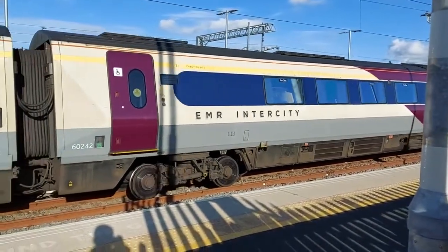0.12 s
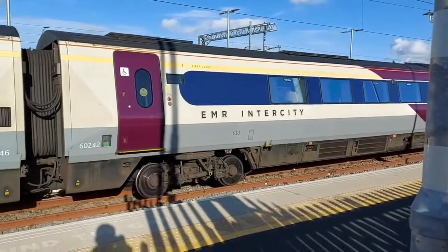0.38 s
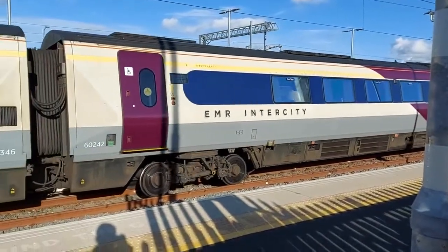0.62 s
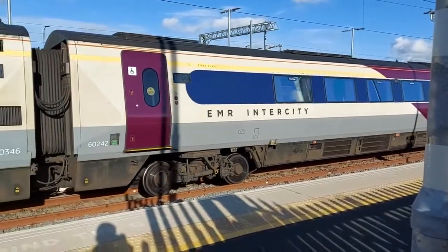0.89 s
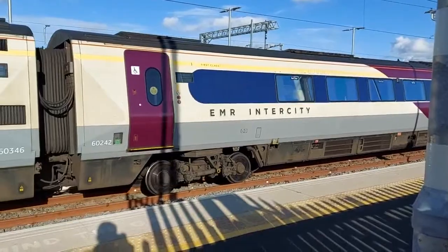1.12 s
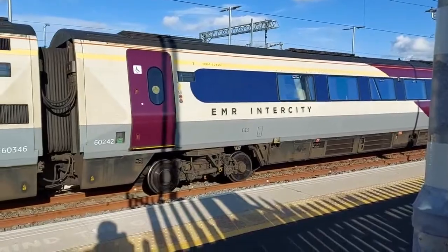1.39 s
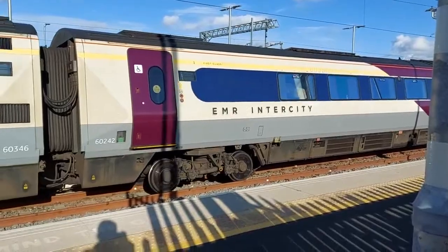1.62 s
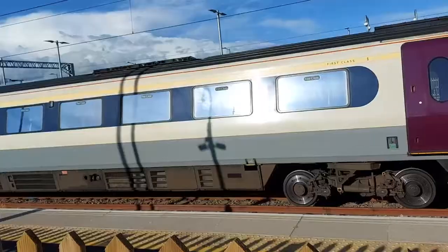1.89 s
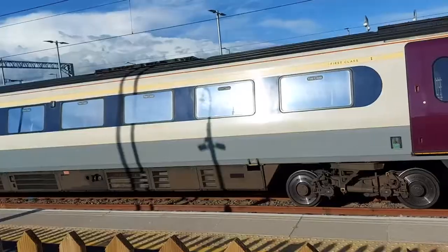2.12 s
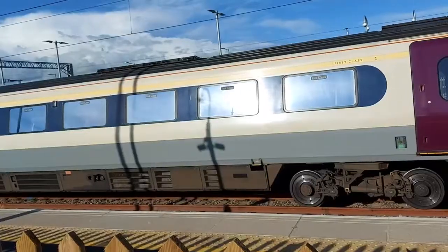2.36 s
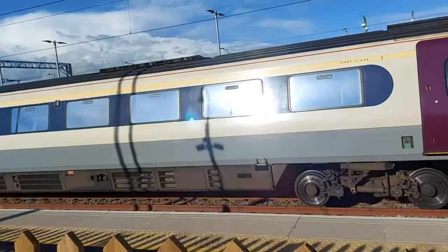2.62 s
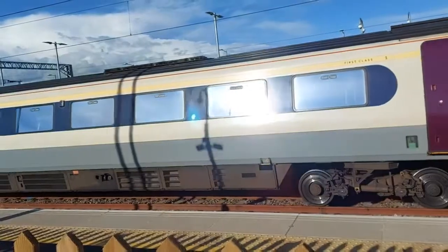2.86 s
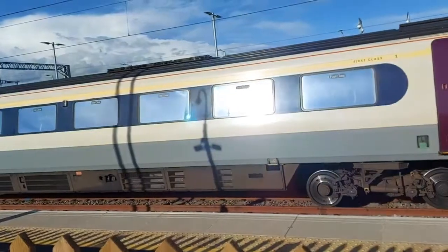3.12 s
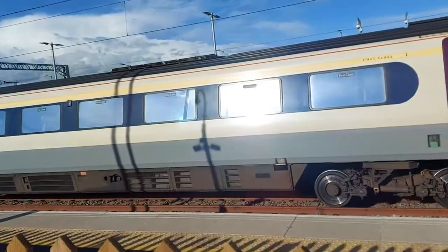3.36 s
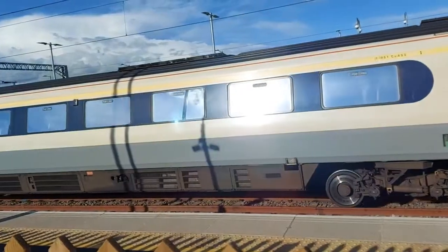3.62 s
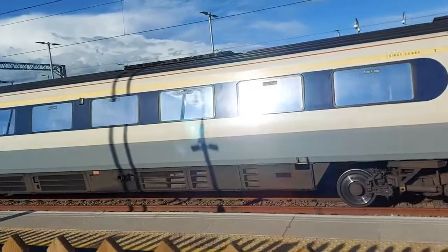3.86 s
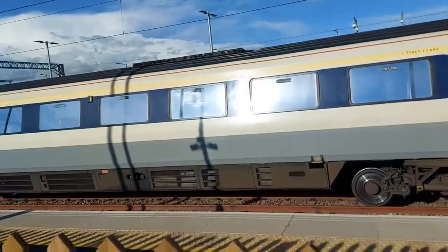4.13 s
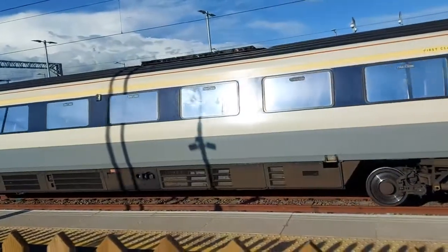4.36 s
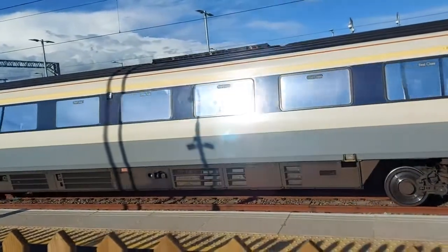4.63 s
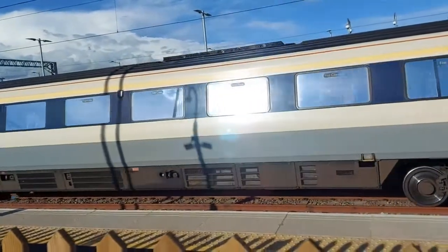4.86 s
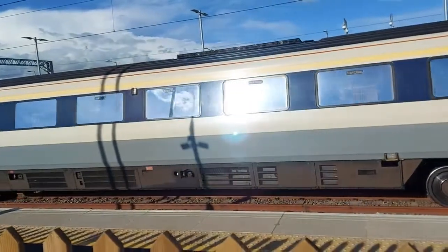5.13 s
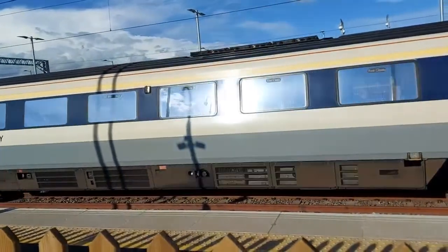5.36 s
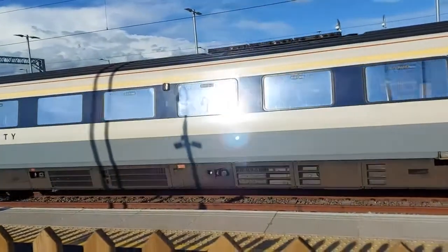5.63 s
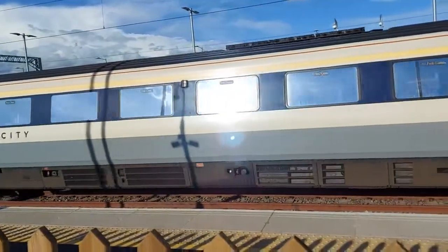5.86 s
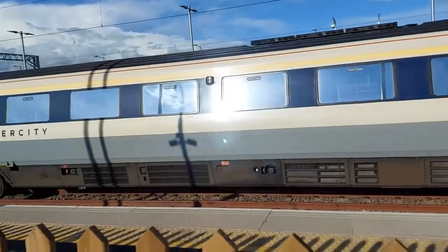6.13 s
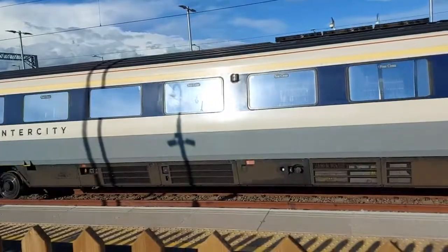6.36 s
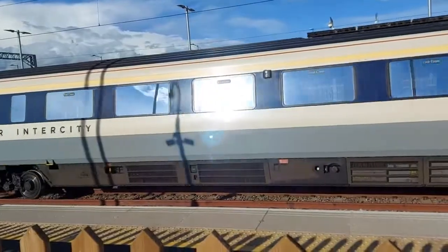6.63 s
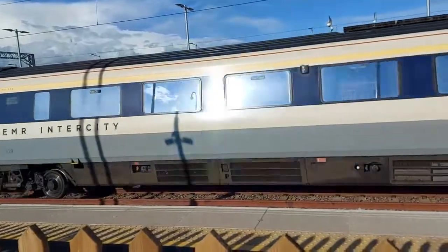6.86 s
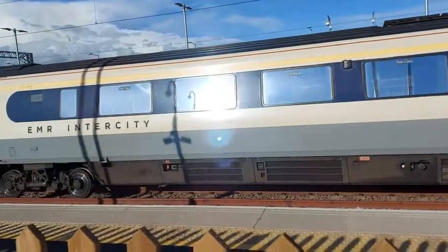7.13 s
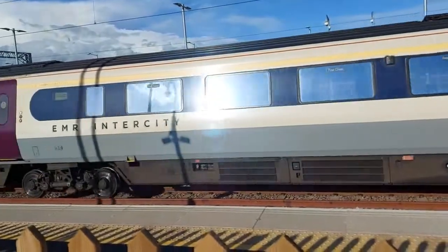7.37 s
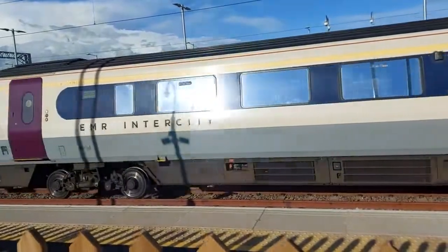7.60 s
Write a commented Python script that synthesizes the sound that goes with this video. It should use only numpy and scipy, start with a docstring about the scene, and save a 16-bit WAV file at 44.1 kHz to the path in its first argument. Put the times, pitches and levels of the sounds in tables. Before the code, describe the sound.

Fast-idling diesel train drones close by, then a sudden change of spot brings a deeper rising engine roar, airy hiss, and faint wheel rubbing.

```python
"""A diesel train at a station platform, heard through two ports from two spots joined by a cut at 2 s.
First we stand beside fast-idling underfloor engines: knocking noise repeats each cycle, exhaust tones throb,
thin gear tones waver, a hum fades early and a whistle passes. Further along the engines rev up and pull away:
exhaust harmonics climb and dip, blocks clatter, air hisses, converters whine and wind buffets the ports.
A late engine swells as narrow noise bands make a flange rub; last, an engine draws near under rings and ticks."""
import sys
import numpy as np
from scipy import signal
from scipy.fft import rfft, irfft, next_fast_len
from scipy.io import wavfile
from scipy.ndimage import uniform_filter1d, map_coordinates

SR = 44100
rng = np.random.default_rng(int(sys.argv[2]) if len(sys.argv) > 2 else 0)


def wav_out(sig):
    """Save sig, one row per channel (or a flat mono array), as 16-bit PCM at SR to the path in sys.argv[1]."""
    wavfile.write(sys.argv[1], SR, np.round(np.clip(np.atleast_2d(sig).T, -1, 1) * 32767).astype(np.int16))


def to_linear_factor(level_db):
    """Convert decibel levels (scalar or array-like) to linear amplitude factors."""
    exponent = np.asarray(level_db, float) / 20
    return 10 ** exponent


N = 341334
TIME = np.arange(N) / SR
SIZE = next_fast_len(N)
FREQ = np.maximum(np.arange(SIZE // 2 + 1) * SR / SIZE, 1)
CUT_S = 2.007  # the listening spot changes

# Arrival at the two ports. Each row: time in seconds, lag of the left port in samples (negative: right lags).
LEFT_LAG = [(0, 12.5), (2.0, 12.5), (2.02, 25.5), (4.2, 22), (4.7, -12), (5.7, -8.5), (7.74, 7)]
# How near an engine is while pulling away. Each row: time in seconds, nearness in dB.
NEARNESS = [(2.02, 2.5), (3.2, -1), (4.4, 3), (5.7, 2), (6.3, 12), (7.0, 15), (7.74, 18.5)]
# Likeness of the ports while pulling. Each row: frequency in Hz, shared part of the power (0-1).
PULL_ALIKE = [(60, 0.88), (300, 0.89), (500, 0.51), (800, 0.25), (1500, 0.29), (3100, 0.32), (6000, 0.11),
              (15000, 0.049)]
# Balance of the ports while pulling. Each row: frequency in Hz, left minus right in dB.
PULL_BALANCE = [(60, -1), (110, 2), (200, -0.5), (380, -0.5), (700, 2), (1290, 0), (2380, -1), (4400, -0.5),
                (8120, -2.5), (15000, -2.5)]
# Exhaust harmonics and the gear-mesh tone (multiple 14) swell for a moment, or sink where the lift is negative.
# Each row: time in seconds, half length in seconds, multiple of the firing rate, lift in dB.
SWELLS = [(0.24, 0.54, 3, 6), (1.48, 0.14, 3, 4), (2.02, 0.16, 3, 8), (3.57, 0.19, 3, 1),
          (7.24, 0.36, 3, 8.5), (4.92, 0.47, 4, 11), (5.74, 0.43, 4, 3.5), (6.2, 0.34, 14, 10),
          (7.42, .15, 14, 8), (6.85, 0.091, 1, 3), (2.2, 0.041, 2, -6), (2.49, 0.45, 14, 15),
          (0.89, 0.15, 1, 6), (.45, 0.066, 1, 5)]


def level(x, db):
    """Scale to an rms level."""
    return x * to_linear_factor(db) / np.sqrt(np.mean(x ** 2))


def curves(table):
    """Columns of a time table, one value a sample."""
    s, *columns = np.transpose(table)
    return [np.interp(TIME, s, c) for c in columns]


def over_hz(table):
    """A (Hz, value) table on every frequency bin, joined along log frequency."""
    hz, value = np.transpose(table)
    return np.interp(np.log(FREQ), np.log(hz), value)


def walk(rate):
    """Random values drawn rate times a second, smoothly joined; spread near 1."""
    points = rng.standard_normal(int(N / SR * rate) + 4)
    return map_coordinates(points, [TIME[::32] * rate]).repeat(32)[:N]


def bell(s, half_s):
    """A smooth hump of height 1."""
    return np.exp(-((TIME - s) / half_s) ** 2)


def fade_db(s, rise_s, hold_s, fall_s, depth_db=25):
    """Rise, hold and fall in dB, at -120 dB outside."""
    times = s + np.cumsum([0, rise_s, hold_s, fall_s])
    return np.interp(TIME, times, [-depth_db, 0, 0, -depth_db], left=-120, right=-120)


def humps(rows, count):
    """The summed dB of the rows that touch one harmonic, each at its own listening spot."""
    return sum(db * bell(s, half_s) * ((TIME > CUT_S) == (s > CUT_S))
               for s, half_s, k, db in rows if round(k) == count)


def tone(phase, db, waver_db=0.0, rate=8):
    """A sine whose level wavers."""
    waver = uniform_filter1d(waver_db * walk(rate), size=32)
    return np.sqrt(2) * to_linear_factor(db + waver) * np.sin(phase)


def resonance(white, hz, width):
    """Noise spectra passed through one narrow band, back in time."""
    return irfft(white / (1 + (2 * (FREQ - hz) / width) ** 4), SIZE)[:, :N]


def spread(shared, colour, alike, balance_db, lift=None, aim=1):
    """Colour a source for two ports: a shared part offset in arrival, and a diffuse part of each."""
    # Ringing panels. Each row: frequency in Hz, width in Hz, lift while waiting in dB, lift while pulling in dB.
    panels = [(805, 10, 1, 4.5), (990, 770, 2, -3.5), (1737, 62, 9, 4), (3026, 150, 9, 2.5),
              (5070, 420, 6.5, 4.5)]
    db = over_hz(colour) + np.array([[.5], [-.5]]) * over_hz(balance_db)
    for hz, width, *lift_db in panels if lift is not None else []:
        db = db + lift_db[lift] / (1 + (2 * (FREQ - hz) / width) ** 2)
    lag = np.round(aim * curves(LEFT_LAG)[0]).astype(int)
    left = shared[np.clip(np.arange(N) - lag, 0, N - 1)]
    share = np.clip(over_hz(alike), 0, 1)
    direct = np.sqrt(share) * rfft(np.array([left, shared]), SIZE)
    diffuse = np.sqrt(1 - share) * rfft(rng.standard_normal((2, SIZE)))
    return level(irfft((direct + diffuse) * to_linear_factor(db), SIZE)[:, :N], 0)


def flicker(x, broad_db=1.86, narrow_db=1.5):
    """Many small parts sound at once: half-octaves flutter quickly, narrow strips come and go more slowly."""
    hz, s, cells = signal.stft(x, SR, nperseg=1024)
    octave = np.log2(np.maximum(hz, 60) / 60)
    broad, narrow = rng.standard_normal((2, 200, 300))
    broad = broad - uniform_filter1d(broad, size=3, axis=1)  # a flutter with no slow swell in it
    narrow = (narrow - .6 * np.roll(narrow, 1, axis=1)) / 1.17
    broad_at = np.meshgrid(2 * octave, 32 * s, indexing="ij")
    narrow_at = np.meshgrid(np.minimum(hz / 120, 18 * octave), 9 * s, indexing="ij")
    # both weaken towards the treble
    db = broad_db / (1 + (hz[:, None] / 9000) ** 2) * map_coordinates(broad, broad_at)
    db = db + narrow_db / (1 + (hz[:, None] / 7000) ** 2) * map_coordinates(narrow, narrow_at)
    return signal.istft(cells * to_linear_factor(db), SR, nperseg=1024)[1][:, :N]


def thin_tones(lines, waver_db=2.5):
    """Drifting sines that waver in level separately at each port, offset in arrival at the left."""
    late_s = curves(LEFT_LAG)[0] / SR
    out = 0
    for hz, db in lines:
        drift = np.cumsum(walk(23)) * 39.2 / SR  # radians
        out = out + np.array([tone(2 * np.pi * hz * (TIME - s) + drift, db, waver_db) for s in (late_s, 0)])
    return out


def wind():
    """Low turbulence in gusts, unrelated at the two ports; short buffets strike both and are brighter."""
    # Gusts on the ports. Each row: time in seconds, level in dB before the random waver.
    gusts = [(0.0, -60), (0.7, -38), (1.5, -30.5), (1.9, -40), (2.7, -28), (3.5, -34), (4.0, -26.5),
             (4.7, -27.5), (5.5, -34.5), (6.8, -31.5), (7.74, -33)]
    # Buffets. Each row: time in seconds, half length in seconds, level in dB.
    buffets = [(2.825, .007, -26), (2.855, .01, -26), (2.9, .02, -31), (3.17, .012, -27), (3.25, .02, -30)]
    air_colour = [(20, -14), (60, 7.5), (150, 12.0), (300, -11.0), (900, -32), (5000, -99)]
    slap_colour = [(20, -15), (80, 0), (330, -6), (500, -11), (800, -30), (4000, -99)]
    white = rfft(rng.standard_normal((3, SIZE)))
    air = irfft(white[:2] * to_linear_factor(over_hz(air_colour)), SIZE)[:, :N]
    slap = irfft((white[2] + .6 * white[:2]) * to_linear_factor(over_hz(slap_colour)), SIZE)[:, :N]
    gust_db = curves(gusts)[0] + 4.2 * np.array([walk(30), walk(30)])
    blows = sum(to_linear_factor(db) * bell(s, half_s) for s, half_s, db in buffets)
    return level(air, 0) * to_linear_factor(gust_db) + level(slap, 0) * blows


def thumps():
    """Short dull thumps within the buffets, each a quickly damped low swing."""
    # Each row: start in seconds, swing in dB before damping.
    thump_rows = [(2.826, -24), (2.8465, -19), (2.853, -12), (2.921, -27)]
    swing_hz, decay_s = 330, .0035
    out = 0
    for s, db in thump_rows:
        after = np.maximum(TIME - s, 0)
        out = out - to_linear_factor(db) * np.exp(-after / decay_s) * np.sin(2 * np.pi * swing_hz * after)
    return out


def rings():
    """Short swells of noise in narrow resonances, and a few thin ticks."""
    # Bands that ring out. Each row: time in seconds, half length in seconds, frequency in Hz, width in Hz,
    # level in dB.
    ring_rows = [(1.976, 0.013, 3080, 300, -38), (2.5, 0.18, 1030, 50, -47), (2.7, 0.1, 790, 50, -49),
                 (4.4, .2, 1350, 40, -48), (5.3, 0.16, 1343, 34.97, -49), (5.35, 0.14, 823, 40, -44),
                 (5.749, 0.13, 720, 50, -45.5), (6.4, 0.38, 685.8, 40, -44), (6.647, 0.061, 996, 50, -38),
                 (7.245, .25, 730, 70, -44), (7.53, .22, 986.5, 55, -40.5), (5.75, .2, 5340, 60, -56),
                 (6.1, .07, 14050, 150, -64)]
    # Faint high ticks. Each row: time in seconds, level in dB.
    tick_rows = [(5.99, -46), (6.045, -47)]
    white = rfft(rng.standard_normal((3, SIZE)))
    white = white[2] + 0.43 * white[:2]  # partly alike at the two ports
    out = level(resonance(white, 11500, 5000), 0) * sum(to_linear_factor(db) * bell(s, .003) for s, db in tick_rows)
    for s, half_s, hz, width, db in ring_rows:
        out = out + to_linear_factor(db) * bell(s, half_s) * level(resonance(white, hz, width), 0)
    return out


def opening_hum():
    """A single wavering tone that fades out early."""
    # Each row: frequency in Hz, level in dB before the fade.
    hum = [(361, -38)]
    return thin_tones(hum, 1.5) * to_linear_factor(fade_db(-.1, .1, .45, .3))


def whistle():
    """A thin whistle with its octave sounds for a moment."""
    # Each row: frequency in Hz, level in dB before the fades.
    whistle_lines = [(1287, -51), (2573, -58)]
    return thin_tones(whistle_lines, 1.5) * to_linear_factor(fade_db(1.15, .08, .55, .08))


def gear_tones():
    """Gears and shafts turning at a steady rate sound as thin tones while waiting."""
    # Each row: frequency in Hz, level in dB.
    gear_lines = [(134, -42.5), (289.5, -40), (360.5, -48), (612, -49), (726.7, -48.5), (786, -45),
                  (974.4, -59), (1071, -43.5), (1511, -63)]
    return thin_tones(gear_lines)


def converter_whine():
    """Converters whine as thin high tones while pulling."""
    # Each row: frequency in Hz, level in dB.
    converter_lines = [(2705, -54.5), (5405, -63)]
    return thin_tones(converter_lines)


def flange():
    """Fine stick-slip noise rings the wheel in a few narrow bands, some joining later."""
    # The wheel's rings. Each row: frequency in Hz, width in Hz, relative level in dB, joining time in seconds.
    wheel = [(4000, 3500, -13, 4.5), (6070, 200, -3, 4.8), (7930, 130, 4, 5.2), (10000, 150, 3, 4.5),
             (14050, 240, -1, 4.5)]
    white = rfft(rng.standard_normal((2, SIZE)))
    ringing = sum(to_linear_factor(db) * resonance(white, hz, width) * np.clip((TIME - s) / 0.036, 0, 1)
                  for hz, width, db, s in wheel)
    rub_db = -49 + fade_db(4.5, .22, .8, .08) + 1.81 * walk(26)
    return ringing / ringing[:, -SR:].std() * to_linear_factor(rub_db)


def cooling_air():
    """Cooling air is mostly diffuse broad noise that follows the nearness and surges once."""
    # Colour of the hiss. Each row: frequency in Hz, relative level in dB.
    hiss_colour = [(1290, -11.5), (2200, 0.5), (2510, -7.5), (3100, -5), (4130, -7.5), (4560, -10),
                   (5280, -5.5), (6070, -9.5), (8630, -7.5), (12300, -10.5), (15600, -18)]
    db = -51 + .94 * curves(NEARNESS)[0] + 9.6 * bell(5.03, .36)
    return to_linear_factor(db) * spread(rng.standard_normal(N), hiss_colour, PULL_ALIKE, PULL_BALANCE)


def covers():
    """Covers near the engine ring fitfully: noise in narrow resonances that grows as the engine nears."""
    # Each row: frequency in Hz, width in Hz, level in dB at nearness 0, share of the nearness followed (0-1).
    cover_rows = [(1735, 125, -47, 0.43), (990, 40, -60, 0.8)]
    out = 0
    for hz, width, db, share in cover_rows:
        edges = [(hz - 3 * width, -40), (hz - width / 2, -3), (hz, 0),
                 (hz + width / 2, -3), (hz + 3 * width, -40)]
        noise = spread(rng.standard_normal(N), edges, PULL_ALIKE, PULL_BALANCE)
        out = out + noise * to_linear_factor(db + share * curves(NEARNESS)[0] + 2.5 * walk(25))
    return out


def valve_gear(hz):
    """Ticking of valves and injectors: thin lines at high multiples of the crank turn that come and go."""
    cover_hz, width_hz = 760, 340  # the cover they ring through
    turn = 2 * np.pi * np.cumsum(hz) / SR / 3
    db = -61 + .5 * curves(NEARNESS)[0]
    out = 0
    for k in range(24, 42):
        gain = 1 / (1 + (2 * (k * hz / 3 - cover_hz) / width_hz) ** 4)
        out = out + gain * tone(k * turn + 1.3 * walk(12), db, 2.5, 9)
    return (TIME > CUT_S) * out


def block_knocks(hz, keep=0.807, knock=0.19, count=4800):
    """White knocking that keeps much of its pattern from one four-stroke cycle (six firings) to the next."""
    cycles = np.cumsum(hz) / SR / 6
    fresh = rng.standard_normal((int(cycles[-1]) + 20, count))  # one row a cycle
    pattern = signal.lfilter([np.sqrt(1 - keep ** 2)], [1, -keep], fresh, axis=0)
    pattern = pattern[15:].ravel()  # past the settling of the filter
    return pattern[(cycles * count).astype(int)] * (1 + knock * np.cos(2 * np.pi * 6 * cycles))


def waiting_engines(knocks, throb):
    """The knocking through the engines beside us, its bass throbbing once a cycle."""
    # Colour of the engines. Each row: frequency in Hz, relative level in dB.
    wait_colour = [(25, -23), (55, -7.5), (130, -10), (190, -10), (250, -12.5), (350, -11), (490, -17.5),
                   (600, -15.5), (1100, -13.5), (1300, -22.5), (1650, -13.5), (1850, -19.5), (2600, -26),
                   (3200, -24), (3500, -30), (5300, -38.5), (6000, -43.5), (8200, -48.5), (9500, -44),
                   (11700, -48.5), (12600, -52), (15700, -53)]
    # Likeness of the ports. Each row: frequency in Hz, shared part of the power (0-1).
    wait_alike = [(60, 0.53), (300, 0.98), (700, 0.94), (1100, 0.67), (1500, 0.49), (3100, 0.62), (6000, 0),
                  (15000, 0.05)]
    # Balance of the ports. Each row: frequency in Hz, left minus right in dB.
    wait_balance = [(60, -0.5), (110, 0), (200, 1), (380, -0.5), (700, -1), (1290, 3), (2380, 0.5),
                    (4400, -2.5), (8120, -10), (15000, -9)]
    engines = to_linear_factor(-27.5) * spread(knocks, wait_colour, wait_alike, wait_balance, lift=0)
    bass = signal.sosfilt(signal.butter(2, 450, fs=SR, output="sos"), engines)
    return engines + (throb - 1) * bass


def pulling_engines(knocks, rumble_db):
    """The same knocking as low rumble and as brighter clatter through ringing panels."""
    # Colour of the rumble. Each row: frequency in Hz, relative level in dB.
    rumble_colour = [(25, -37), (45, -20), (100, -4.5), (170, 5.5), (250, -1), (350, 1.5), (450, -14),
                     (600, -65), (2000, -88)]
    # Colour of the clatter. Each row: frequency in Hz, relative level in dB.
    clatter_colour = [(300, -24), (480, -5.5), (570, -8), (800, -2), (1000, -3.5), (1250, -5), (1600, -7),
                      (1900, -12.5), (2600, -18), (3300, -16), (4200, -22), (4900, -33), (5400, -26),
                      (6500, -32), (7900, -48), (8600, -26), (10300, -25.5), (11000, -38), (11800, -32),
                      (13000, -36), (15700, -60)]
    clatter_db = -35.5 + .11 * curves(NEARNESS)[0]
    # low sound comes from the whole train side, so its lag is smaller
    rumble = to_linear_factor(rumble_db) * spread(knocks, rumble_colour, PULL_ALIKE, PULL_BALANCE, aim=0.33)
    return rumble + to_linear_factor(clatter_db) * spread(knocks, clatter_colour, PULL_ALIKE, PULL_BALANCE, lift=1)


def late_engine():
    """An engine further along revs up late: a rising firing tone and its octave."""
    start_hz, hz_per_s = 40.67, 21.5  # rate at 4 s, and its climb
    phase = 2 * np.pi * np.cumsum(start_hz + hz_per_s * (TIME - 4.0)) / SR
    db = -25 + fade_db(3.8, 1.14, .24, .34, depth_db=30)
    return tone(phase, db, 5.1, 5.07) + tone(2 * phase, db - 15)


def gear_mesh(turn):
    """Gear teeth meet at fourteen times the firing rate, growing louder after the cut."""
    db = -67 + 2.5 * (TIME - CUT_S) + humps(SWELLS, count=14)
    return (TIME > CUT_S) * tone(42 * turn + .8 * walk(12), db, 2.0, 14)


def crank_turn(hz):
    """Crank angle in radians, three firings a turn, with a slight flutter."""
    return 2 * np.pi * np.cumsum(hz * (1 + .003 * walk(12) + .001 * walk(3))) / SR / 3


def cylinder_throb(hz, later):
    """One cylinder fires harder while waiting: a gain that swings once a cycle and deepens at first."""
    depth = .4 * (1 - later) * np.clip(TIME / .45, .3, 1)
    return 1 + depth * np.cos(2 * np.pi * np.cumsum(hz) / SR / 6 + 5.0)


def exhaust(turn, tones_db, uneven_db):
    """Four firing harmonics that dip and swell, and weaker wavering tones at multiples of the crank turn."""
    # Weaker tones from uneven cylinders. Each row: multiple of a third of the firing rate, dB against uneven_db.
    uneven = [(2, -14.5), (4, -14), (5, -13), (7, -7.5), (8, -13), (10, -23.5), (11, -13.5), (13, -15.5),
              (14, -22), (15, -19.5)]
    # Neighbouring exhausts fall out of step and a tone dips.
    # Each row: time in seconds, half length in seconds, multiple of the firing rate, depth in dB.
    dips = [(1.1, 0.088, 1, 16), (1.53, 0.046, 1, 12), (1.8, 0.16, 1, 15), (2.2, 0.041, 1, 18),
            (3.12, 0.033, 1, 9), (3.24, 0.072, 1, 1.5), (3.72, 0.11, 1, 11), (4.25, 0.22, 1, 22),
            (5.1, .03, 1, 12), (5.25, 0.05, 1, 17), (5.39, 0.04, 1, 10), (5.73, 0.069, 1, 5.5),
            (5.98, 0.062, 1, 1), (6.22, 0.049, 1, 3), (6.45, 0.062, 1, 5), (6.71, 0.072, 1, 9),
            (6.99, 0.043, 1, 8), (7.65, 0.068, 1, 12), (.8, 0.11, 2, 2), (1.17, 0.061, 2, 8),
            (1.53, 0.037, 2, 7), (1.9, 0.06, 2, 22), (3.27, 0.031, 2, 7), (4.54, 0.1, 2, 24),
            (5.22, 0.038, 2, 21), (5.54, 0.03, 2, 9), (5.68, .025, 2, 8), (5.8, 0.041, 2, 7),
            (6.21, 0.042, 2, 12), (6.31, 0.021, 2, 10), (6.57, .03, 2, 2), (6.42, 0.026, 2, 16),
            (6.98, 0.044, 2, 17), (7.46, 0.06, 2, 22), (.8, 0.051, 3, 10), (1.07, 0.071, 3, 25),
            (2.42, 0.053, 3, 14)]
    pulling = TIME > CUT_S
    waver_db = np.where(pulling, 1.0, 2.0)
    rough = np.where(pulling, .08, .35)  # radians of phase wander
    out = 0
    for k, db in enumerate(tones_db, 1):
        db = db - humps(dips, count=k) + humps(SWELLS, count=k)
        out = out + tone(3 * k * turn + k + rough * walk(14), db, waver_db, 12)
    third_db = np.where(pulling, -40, -36.5) + humps(SWELLS, count=3) - humps(dips, count=3)
    fourth_db = np.where(pulling, -43.5, -44.5) + humps(SWELLS, count=4)
    out = out + tone(9 * turn + rough * walk(14), third_db, 1.8, 12)
    out = out + tone(12 * turn + walk(9), fourth_db, 1.6, 14)
    for k, db in uneven:
        wander = np.cumsum(walk(8)) * 11.94 / SR  # radians
        out = out + tone(int(k) * turn + wander, db + uneven_db, 3.5, 5)
    return out


def scene():
    """Two listening spots, one after the other."""
    # The engines rev up. Each row: time in seconds, firing rate in Hz, firing tone in dB, second harmonic in dB
    # (both before throb, dips and swells).
    revs = [(0, 57.27, -45, -32.5), (0.9, 57.38, -37, -35), (2.006, 57.42, -33, -35.5),
            (2.008, 56.18, -31.5, -26.5), (2.7, 59.01, -21.5, -25.5), (3.5, 63.4, -19.5, -26),
            (4.0, 65.72, -22.5, -22), (4.4, 68.61, -27.5, -17), (4.75, 70.8, -18.5, -17.5),
            (5.1, 71.88, -18, -22.5), (5.6, 72.66, -18.5, -22), (6.0, 73.33, -21, -17),
            (6.6, 76.22, -25.5, -19.5), (7.3, 80.12, -21.5, -16), (7.74, 81.17, -23.5, -19.5)]
    # Drone and wind drop out briefly. Each row: time in seconds, half length in seconds, depth in dB.
    dropouts = [(3.11, .014, 14), (3.22, .012, 22)]
    hz, *tones_db = curves(revs)
    later = np.clip((TIME - CUT_S) / .002, 0, 1)  # 0 at the first spot, 1 at the second
    rumble_db = -30.5 + .13 * curves(NEARNESS)[0]
    throb = cylinder_throb(hz, later)
    knocks = block_knocks(hz)
    pulling = pulling_engines(knocks, rumble_db) + cooling_air()
    engines = flicker((1 - later) * waiting_engines(knocks, throb) + later * pulling)
    turn = crank_turn(hz)
    uneven_db = np.where(later > 0, rumble_db, -38.0)
    drone = throb * (exhaust(turn, tones_db, uneven_db) + gear_mesh(turn) + late_engine())
    dropout_db = -sum(db * bell(s, half_s) for s, half_s, db in dropouts)
    low = (drone + wind()) * to_linear_factor(dropout_db)
    tones = (1 - later) * gear_tones() + later * converter_whine() + opening_hum() + whistle()
    details = later * covers() + thumps() + rings() + flange() + valve_gear(hz)
    return engines + low + tones + details


def band_limit(x):
    """A steep low-pass at the top of the band."""
    return signal.sosfilt(signal.butter(12, 15710, fs=SR, output="sos"), x)


def record(dry):
    """The two ports take the finished mix as it stands."""
    return band_limit(dry)


dry = scene()
out = record(dry)
wav_out(out)
```